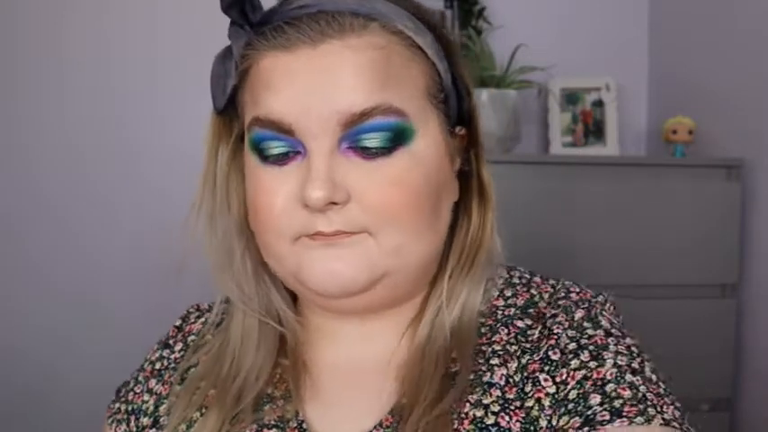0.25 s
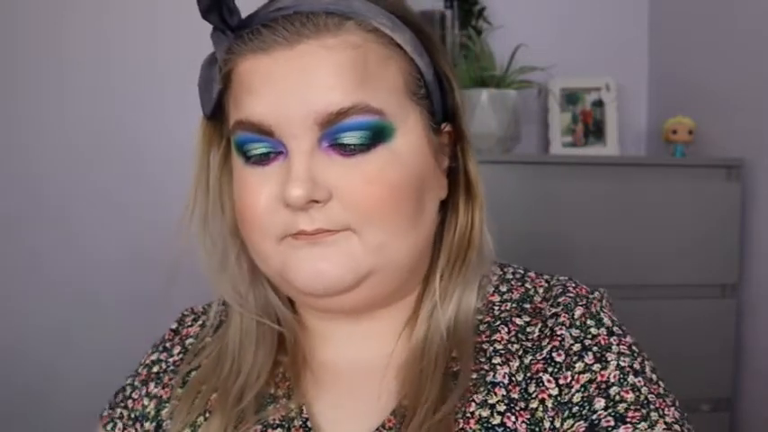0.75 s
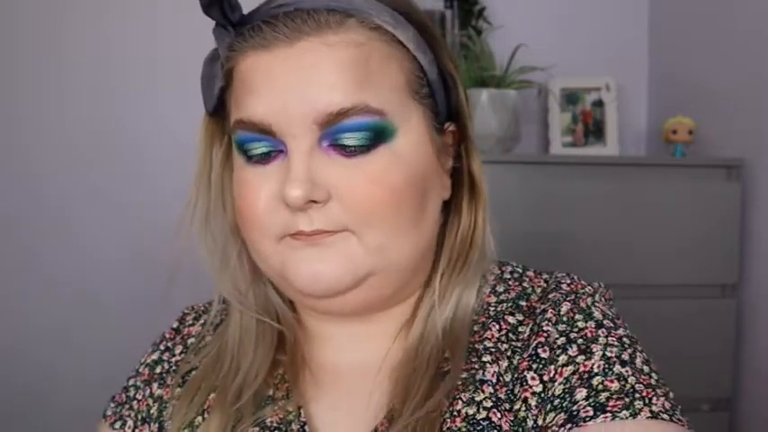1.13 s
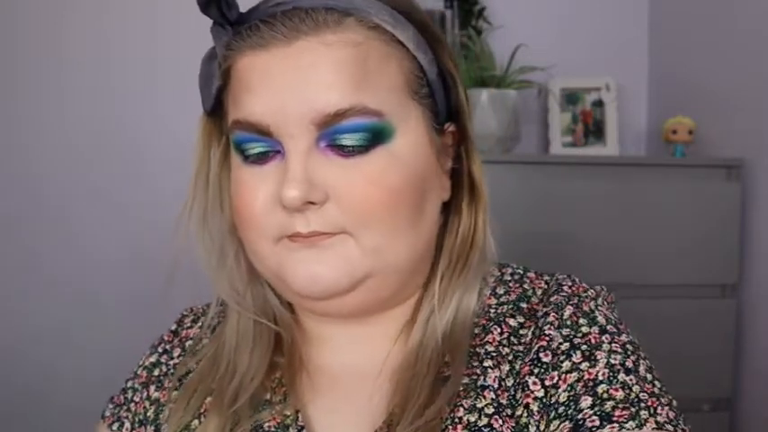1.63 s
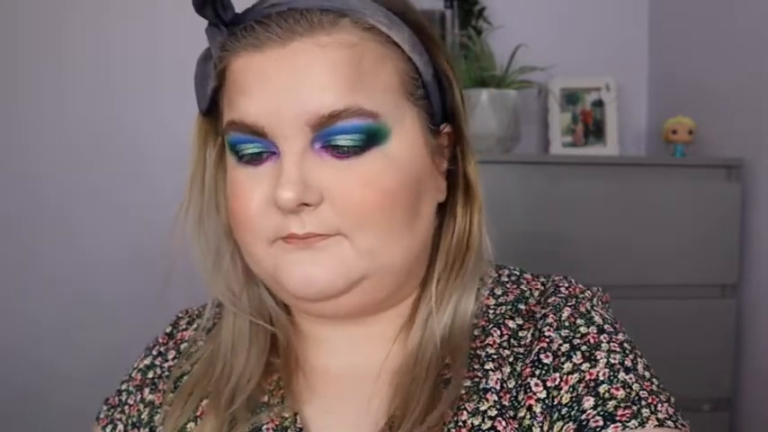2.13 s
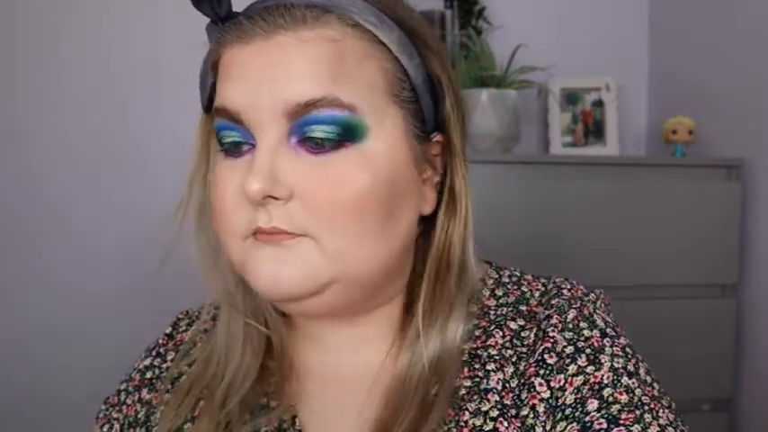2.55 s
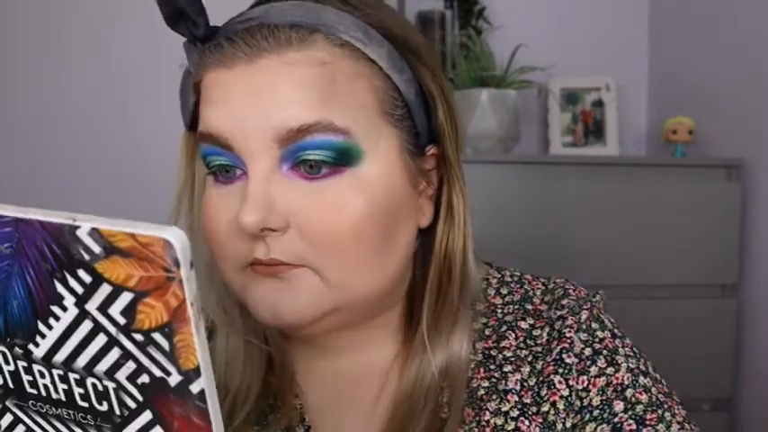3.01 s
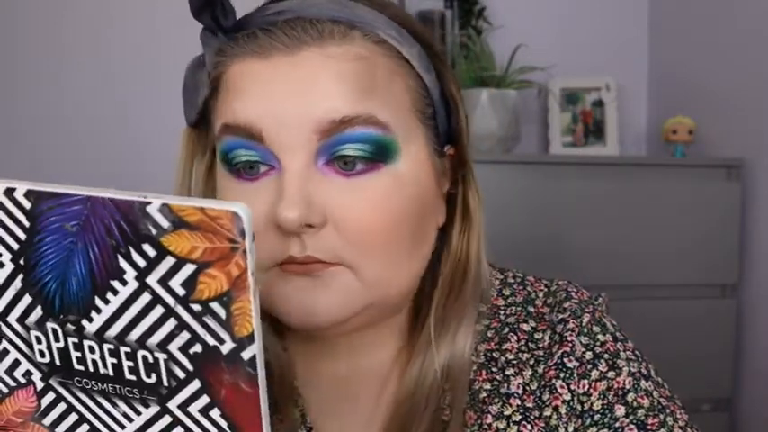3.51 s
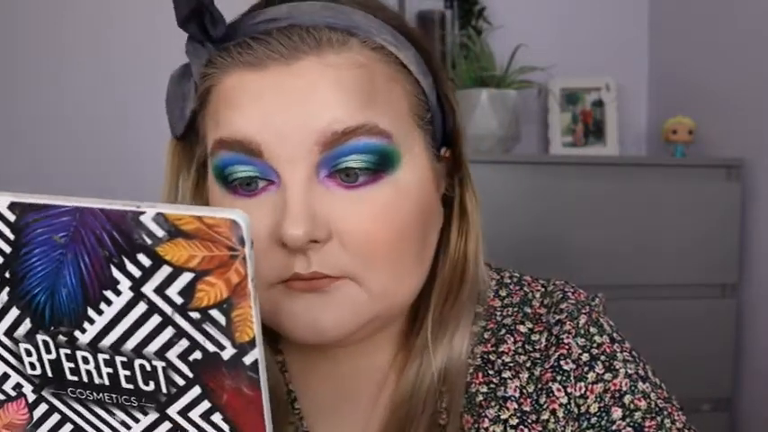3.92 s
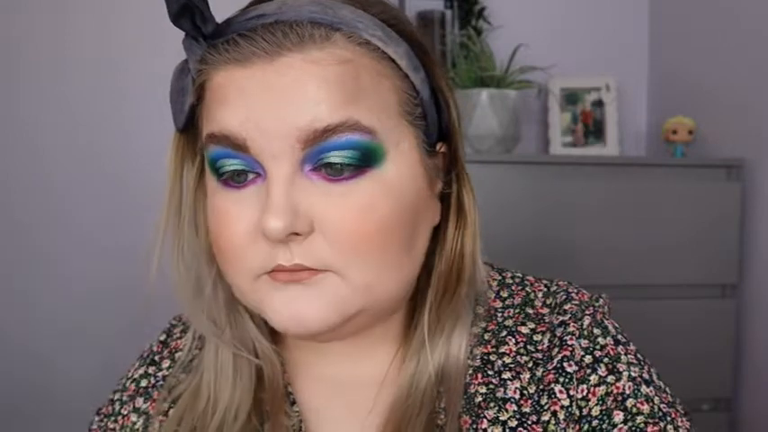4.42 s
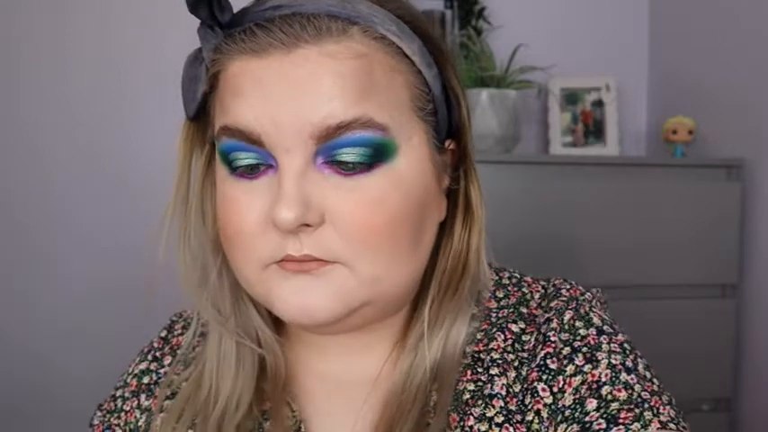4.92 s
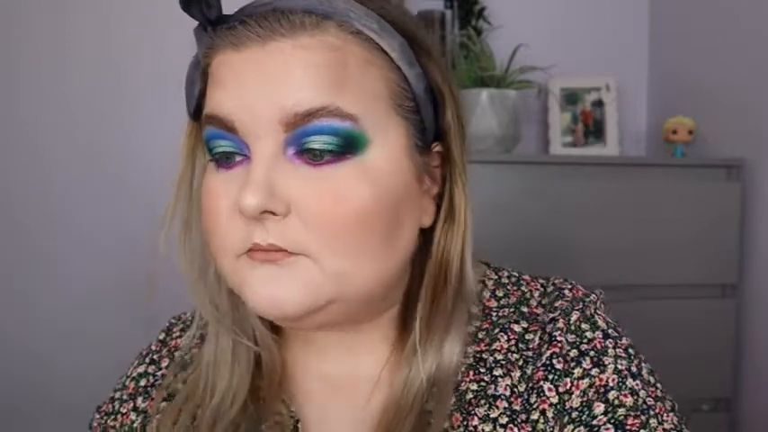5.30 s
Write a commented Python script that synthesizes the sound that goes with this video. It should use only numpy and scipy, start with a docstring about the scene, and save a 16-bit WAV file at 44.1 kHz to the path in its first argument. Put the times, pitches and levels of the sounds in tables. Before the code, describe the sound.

A hard plastic makeup case clatters onto a desk, then cases click and slide softly as they are handled in a quiet room.

```python
"""Makeup cases on a desk

A hard plastic makeup case lands on one edge, then flat, rocking ever faster while case and desk ring
and its loose lid and pans buzz. A nudge makes it judder along in stick-slip pulses. Other cases click
together as they are picked up, fingers brush their lids, a sleeve rustles and arms bump the desk.
The room is small and quiet, with a faint fan hum, heard through one microphone."""
import sys
import numpy as np
from scipy import signal
from scipy.fft import rfft, irfft, next_fast_len
from scipy.io import wavfile
from scipy.ndimage import uniform_filter1d

SR = 44100
rng = np.random.default_rng(int(sys.argv[2]) if len(sys.argv) > 2 else 0)


def dump_mix(stems):
    """Bounce the given channels to the path in sys.argv[1] as a 16-bit WAV at rate SR."""
    frames = np.atleast_2d(stems).T  # one column per channel
    limited = np.clip(frames, -1, 1)  # hard clip at full scale
    pcm = np.round(limited * 32767).astype(np.int16)
    wavfile.write(sys.argv[1], SR, pcm)


N = 244755
TIME = np.arange(N) / SR
HIT_TIME = TIME[:2 ** 15]  # seconds since the start of one hit or echo


def undb(db):
    """Decibels to gain."""
    return 10 ** (np.asarray(db) / 20)


def unit(x):
    """Scale to rms 1."""
    return x / np.sqrt(np.mean(x ** 2))


def add(out, s, x):
    """Mix x into out from time s on."""
    start = int(s * SR)
    out[start:start + len(x)] += x[:len(out) - start]


def colour(x, points):
    """Causal EQ through the given (Hz, dB) points."""
    size = next_fast_len(len(x) // 2 + 1) * 2
    hz, db = np.transpose(points)
    log_hz = np.log(np.maximum(np.arange(size // 2 + 1) * SR / size, 1))
    cepstrum = irfft(np.log(undb(np.interp(log_hz, np.log(hz), db))))[:size // 2]
    cepstrum[1:] *= 2  # minimum phase: nothing sounds ahead of a hit
    return irfft(rfft(x, size) * np.exp(rfft(cepstrum, size)))[:len(x)]


def fade(t60):
    """Exponential decay by 60 dB in t60 seconds."""
    return np.exp(-np.log(1000) * HIT_TIME / t60)


def set_attack_level(x, db):
    """Scale a hit so that its first 4 ms have this rms level."""
    attack = x[:SR // 250]
    return x * undb(db) / np.sqrt(np.mean(attack ** 2))


def swell(peak_s, rise_s, fall_share=0.67):
    """A bell-shaped envelope that falls faster than it rises."""
    width = np.where(TIME < peak_s, rise_s, fall_share * rise_s)
    return np.exp(-((TIME - peak_s) / width) ** 2)


def drift(rate_hz):
    """Smooth random wander with rms 1."""
    hold = max(int(SR / rate_hz), 1)
    steps = np.repeat(rng.standard_normal(N // hold + 1), hold)[:N]
    return unit(uniform_filter1d(steps, hold))


def soft_contact(moves, spectrum):
    """Coloured noise that swells and fades with each movement."""
    force = np.sqrt(sum((undb(db) * swell(s, rise)) ** 2 for s, rise, db in moves))
    return force * unit(colour(rng.standard_normal(N), spectrum))


def hard_contact(length_s, grit, onset_s=0.00081, push_share=0.63, split_hz=700):
    """A touch, a smooth push that carries the lows, and a brief chatter as two surfaces bed in."""
    touch = 1. * (HIT_TIME == 0)
    push = signal.lfilter(*signal.butter(1, split_hz, fs=SR), touch)
    envelope = np.exp(-(HIT_TIME / length_s) ** 2) * (1 - np.exp(-HIT_TIME / onset_s))
    chatter = rng.standard_normal(len(HIT_TIME)) * envelope
    chatter = signal.lfilter(*signal.butter(2, split_hz, "high", fs=SR), chatter)
    return touch + grit * (push_share * push + chatter / np.linalg.norm(chatter))


# The fan's tones. Each row: pitch in Hz, level in dB.
FAN_TONES = [(134.6, -73), (220.7, -62.5), (269.2, -64.5), (301.5, -67.5), (446.8, -59.5), (549.1, -62),
             (586.8, -71), (672.9, -71.5)]
# The colour of the air and hiss. Each row: frequency in Hz, gain in dB.
AIR_EQ = [(15, -19.5), (40, -11), (70, -10), (100, -17.5), (140, -11), (180, -18.5), (225, -11), (300, -11),
          (380, -15.5), (450, -15.5), (600, -14.5), (800, -18), (1600, -24.5), (5000, -27), (16000, -31)]


def fan_and_air(waver_hz=2.24, flutter_db=1.5, air_db=-55):
    """A small fan hums in wavering tones over soft air and microphone hiss."""
    hum = np.zeros(N)
    for hz, db in FAN_TONES:
        amplitude = np.sqrt(2) * undb(db + flutter_db * drift(rate_hz=7))
        cycles = np.cumsum(hz + waver_hz * drift(rate_hz=25)) / SR
        hum += amplitude * np.sin(2 * np.pi * cycles)
    return hum + undb(air_db) * unit(colour(rng.standard_normal(N), AIR_EQ))


# The room's tail. Each row: band centre in Hz, seconds to fall by 60 dB.
ROOM_DECAY = [(150, 0.21), (500, 0.38), (1400, 0.29), (4000, 0.24), (9000, 0.28), (16000, 0.16)]


def room_echoes(x, early_db=4, early_t60=0.091, first_echo_s=0.0005, build_s=0.0032):
    """A quick cluster of echoes from desk and body, then a short dense tail from the walls."""
    hz, t60s = np.transpose(ROOM_DECAY)
    noise = rfft(rng.standard_normal(len(HIT_TIME)))
    log_hz = np.log(np.maximum(np.arange(len(noise)) * SR / len(HIT_TIME), 1))
    bands = [np.interp(log_hz, np.log(hz), solo) for solo in np.eye(len(hz))]
    tail = sum(irfft(noise * band) * fade(t60) for band, t60 in zip(bands, t60s))
    tail += undb(early_db) * rng.standard_normal(len(HIT_TIME)) * fade(early_t60)
    tail *= np.clip((HIT_TIME - first_echo_s) / build_s, 0, 1)
    return signal.fftconvolve(x, tail / np.linalg.norm(tail))[:N]


# Hands and arms meeting the desk. Each row: peak time in seconds, rise in seconds, level in dB.
ARM_BUMPS = [(1.9, 0.1, -48.5), (2.38, 0.028, -40.5), (2.5, 0.063, -52.5), (2.64, 0.074, -50.5),
             (4.59, 0.055, -53), (5.22, 0.13, -56)]
# The desk's dull boom. Each row: frequency in Hz, gain in dB.
DESK_EQ = [(20, 3), (45, -7), (68, 1), (100, -16), (140, 0.5), (200, -20), (350, -9.5), (800, -24),
           (3000, -37)]


def desk_bumps():
    """Hands and arms press softly on the desk, which answers with low thuds."""
    return soft_contact(ARM_BUMPS, DESK_EQ)


# The arm reaching and lifting. Each row: peak time in seconds, rise in seconds, level in dB.
REACHES = [(0.11, 0.37, -50.5), (1.05, 0.44, -50), (2.7, 0.25, -57.5), (2.99, 0.13, -53.5),
           (5.2, 0.21, -57.5), (5.54, 0.25, -53.5)]
# The colour of the cloth. Each row: frequency in Hz, gain in dB.
CLOTH_EQ = [(100, -6.5), (350, 0), (800, -3.5), (1500, -1), (2600, 0), (4500, -4.5), (7500, -7),
            (11000, -12.5), (16000, -22.5)]


def sleeve(follow_db=-9.5, stretch=1.4):
    """Cloth rustles with each reach of the arm and faintly follows each stroke of the fingers."""
    with_strokes = [(start + length / 2, stretch * length, db + follow_db)
                    for start, length, db, _ in FINGER_STROKES]
    return soft_contact(REACHES + with_strokes, CLOTH_EQ)


# Fingers crossing the lids. Each row: start in seconds, length in seconds, relative level in dB,
# tilt in dB per octave.
FINGER_STROKES = [(1.016, 0.073, -45.5, 0), (1.182, 0.11, -48, 3), (1.373, 0.14, -50, 3),
                  (1.631, 0.077, -44, 0), (1.783, 0.17, -51.5, 4), (2.025, 0.13, -42.5, 3.5),
                  (2.272, 0.11, -42.5, 5), (4.592, 0.15, -47, 3), (4.825, 0.065, -43.5, 3.5),
                  (4.955, 0.099, -43.5, 6.5), (5.158, 0.058, -45, 3.5)]
# The colour of skin on plastic. Each row: frequency in Hz, gain in dB.
SKIN_EQ = [(150, 10), (400, 8.5), (1000, 8), (2000, 3.5), (3500, -0.5), (6500, 0), (9000, -5), (13000, -12),
           (16000, -27)]


def finger_brushes(grain_db=2.5, lift_db=1, attack_s=0.016, release_s=0.0067, press_db_per_s=28):
    """Skin drags on plastic in a grainy hiss, brighter when fast, pressing harder until it lets go."""
    out = np.zeros(N)
    hiss = colour(rng.standard_normal(N) * undb(grain_db * drift(rate_hz=540)), SKIN_EQ)
    for start, length, db, tilt_db in FINGER_STROKES:
        settle = (1 + np.tanh((TIME - start) / attack_s / 2)) / 2
        release = (1 + np.tanh((start + length - TIME) / release_s / 2)) / 2
        press = undb(press_db_per_s * np.clip(TIME - start - length, -length, 0))
        tilted = unit(colour(hiss, [(750, -2 * tilt_db), (12000, 2 * tilt_db)]))
        out += undb(db + lift_db) * settle * press * release * tilted
    return out


# The body of the sliding case. Each row: frequency in Hz, gain in dB.
SLIDE_EQ = [(100, -18), (280, -16), (400, 2), (550, -9), (700, -1.5), (900, -11), (1100, -4.5),
            (1600, -19.5), (3000, -27), (10000, -48)]


def case_slide(start_s=0.926, start_hz=477, end_hz=372.6, sag_s=0.01605, jitter=0.065, db=-39.5):
    """One push: uneven stick-slip pulses, sagging in rate, and scraping noise sound through the case."""
    slip_hz = end_hz + (start_hz - end_hz) * np.exp(-np.maximum(TIME - start_s, 0) / sag_s)
    cycles = np.cumsum(slip_hz * (1 + jitter * drift(rate_hz=140))) / SR
    slips = np.diff(np.floor(cycles), prepend=0)
    drag = unit(slips - slips.mean()) + rng.standard_normal(N)
    return undb(db) * swell(peak_s=0.99, rise_s=0.064) * unit(colour(drag, SLIDE_EQ))


# Lids and edges tapping. Each row: start in seconds, attack level in dB, contact time in seconds,
# hollow thud in dB, treble in dB, lower and upper lid mode in Hz, mode gain in dB.
LID_CLICKS = [(1.1033, -19.5, 0.0021, 8, -21, 1620, 2350, -1),
              (1.2459, -19.5, 0.0017, -1, -11, 790, 1390, 5.5),
              (1.473, -23.5, 0.0031, -9, -14, 1680, 2280, 3),
              (1.4971, -17, 0.0017, 3.5, -9.5, 5250, 9200, 7.5),
              (1.6287, -38, 0.00082, 13, -19, 920, 1500, 11), (1.6646, -34, 0.0053, 15, -10, 1090, 1600, 2),
              (1.921, -28.5, 0.0022, 11.5, -18, 884, 1750, 13),
              (2.0900, -26, 0.0056, 2.5, -4.5, 1020, 1410, 9.5),
              (2.1390, -37.5, 0.0058, 8, -12, 830, 1100, 18),
              (4.7929, -19, 0.0041, -17, -21.5, 1260, 2470, -0.5),
              (4.8756, -26.5, 0.0075, 4, -20, 1060, 1330, 8),
              (5.0469, -33.5, 0.0016, 15, -7, 400, 1670, -5)]


def case_clicks(grit, lid_q=7.7):
    """Cases tap together: each snap excites two heavily damped modes of a thin plastic lid."""
    out = np.zeros(N)
    for start, db, length, thud_db, treble_db, lower_hz, upper_hz, mode_db in LID_CLICKS:
        hollow = [(40, thud_db - 22), (170, thud_db - 16), (400, thud_db), (900, 0.54 * thud_db - 5)]
        edge = [(2000, 0), (5000, -2),
                (10000, treble_db), (12000, treble_db - 7), (16000, treble_db - 14)]
        snap = colour(hard_contact(length, grit), hollow + edge)
        ring = sum(signal.lfilter(*signal.iirpeak(hz, lid_q, fs=SR), snap)
                   for hz in (lower_hz, upper_hz))
        add(out, start, set_attack_level(snap + undb(mode_db) * ring, db))
    return out


# The case lands on one edge, then flat. Each row: start in seconds, attack level in dB, loss per rock
# in dB, first gap, shortest gap and rocking time in seconds, treble in dB, dulling per rock in dB,
# extra level of the first rebound in dB.
LANDINGS = [(0.439, -10, 2.5, 0.037, 0.0222, 0.145, -12, 1, 2.8),
            (0.605, -6.5, 4.5, 0.0605, 0.0113, 0.184, -0.5, 0.7, -0.5)]


def rocking(rim_db=6, gap_shrink=0.42):
    """Knocks come faster, weaker and duller: yields start in seconds, then level, treble, rim in dB."""
    for start, db, loss_db, gap, shortest, length, treble_db, dull_db, rebound_db in LANDINGS:
        s, count = start, 0
        while s < start + length:
            on_rim = count == 1  # the first rebound hits the sharp rim
            knock_db = db - count * loss_db + on_rim * rebound_db
            yield s, knock_db, treble_db - count * dull_db, on_rim * rim_db
            s, count = s + gap, count + 1
            gap = shortest + gap_shrink * (gap - shortest)


# The ring of case and desk top. Each row: pitch in Hz, relative level in dB, seconds to fall by 60 dB.
CASE_MODES = [(134.2, -7.5, 0.65), (188, -13, 0.26), (306.4, -8.5, 0.5), (389, -4, 0.42), (415, -9.5, 0.44),
              (690.6, 0.5, 0.25), (807, 2, 0.34), (930, -8, 0.27), (1102, -1, 0.57), (1130, -15, 0.19),
              (1310, 0, 0.24), (1510, 3, 0.34), (1590, 4, 0.31), (1750, 0.5, 0.1), (1923, 2, 0.19),
              (2690, -7.5, 0.087), (2880, -12.5, 0.22), (3330, -4, 0.24), (3790, -13, .14),
              (4100, -23, 0.106), (6370, -9, 0.069)]


def case_ring(detune=0.00646):
    """Case and desk ring; each corner that lands loads and feeds the modes a little differently."""
    ring = np.zeros(len(HIT_TIME))
    for hz, db, t60 in CASE_MODES:
        loaded_hz = hz * (1 + detune * rng.standard_normal())
        ring += undb(db) * fade(t60) * np.sin(2 * np.pi * (loaded_hz * HIT_TIME + rng.random()))
    return ring


# The crack of plastic on the desk. Each row: frequency in Hz, gain in dB.
CRACK_EQ = [(40, -21.5), (130, -15), (300, 2.5), (430, -4.5), (560, -3), (900, -4.5), (1300, -5),
            (1900, -4.5), (2300, -11), (3500, -7), (4800, -17), (6400, -10.5), (8500, -32.5),
            (15000, -45.5)]
# The buzz of the loose lid and pans. Each row: frequency in Hz, gain in dB.
RATTLE_EQ = [(100, -13.5), (300, -2.5), (650, -2), (1200, 7), (1800, -7.5), (2300, -9), (3400, -7),
             (5000, -32), (6500, -14.5), (15000, -54)]


def case_knocks(ring_db=-46, rattle_db=-6, rattle_t60=0.27, edge_lag_s=0.002334, second_edge_gain=0.64):
    """Each knock cracks and rings the case; its other edge lands just after, and loose parts buzz on."""
    out = np.zeros(N)
    for start, db, treble_db, rim_db in rocking():
        force = hard_contact(length_s=0.0021, grit=1.6)
        lag_s = edge_lag_s * np.exp(0.12 * rng.standard_normal())
        add(force, lag_s, second_edge_gain * hard_contact(length_s=0.0014, grit=0.91))
        crack = colour(force, CRACK_EQ)
        buzz = colour(rng.standard_normal(len(HIT_TIME)) * fade(rattle_t60), RATTLE_EQ)
        knock = crack / np.linalg.norm(crack) + undb(rattle_db) * buzz / np.linalg.norm(buzz)
        knock += undb(ring_db) * case_ring()
        bass_db = 0.26 * (db + 6)  # a heavier blow moves the desk more
        bite_db = 0.39 * treble_db + rim_db  # a sharper corner sounds brighter
        hardness = [(400, bass_db), (900, 0.0021), (1900, 0), (3200, bite_db),
                    (6000, treble_db + rim_db / 2), (7200, treble_db), (9500, treble_db / 2)]
        add(out, start, set_attack_level(colour(knock, hardness), db))
    return out


# The microphone's sheen. Each row: frequency in Hz, gain in dB.
MIC_EQ = [(9000, 0), (10800, -1.5), (12500, 1.5), (15500, 1.5)]


def scene():
    """All the handling sounds and the room's echoes over the fan, in mono."""
    knocks = case_knocks()
    rubbing = case_slide() + finger_brushes()
    direct = knocks + rubbing + case_clicks(grit=1.52)
    # the walls hear every face of a case at once, which evens out the chatter of a click
    room_send = undb(-6) * knocks + undb(-7.5) * rubbing + undb(-4) * case_clicks(grit=0.41)
    handling = direct + room_echoes(room_send) + desk_bumps() + sleeve()
    return (colour(handling, MIC_EQ) + fan_and_air())[None]


def record(dry):
    """Peaks clip at full scale, then a steep low-pass cuts the very top."""
    lowpass = signal.ellip(10, .1, 70, 15900, fs=SR, output="sos")
    return signal.sosfilt(lowpass, np.clip(dry, -1, 1))


dry = scene()
out = record(dry)
dump_mix(out)
```